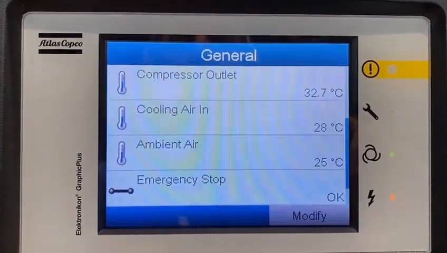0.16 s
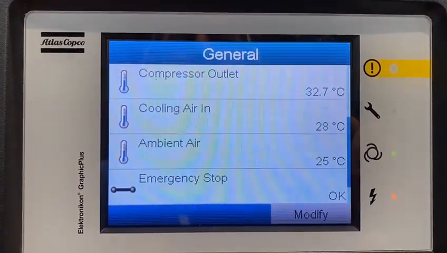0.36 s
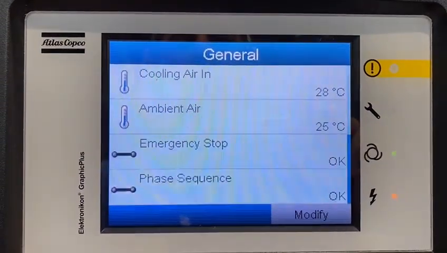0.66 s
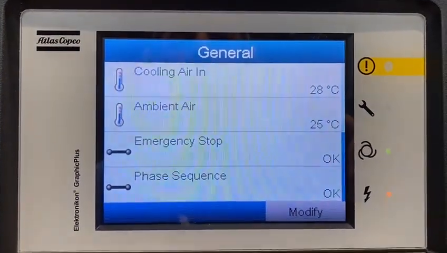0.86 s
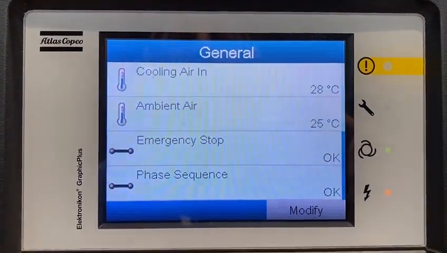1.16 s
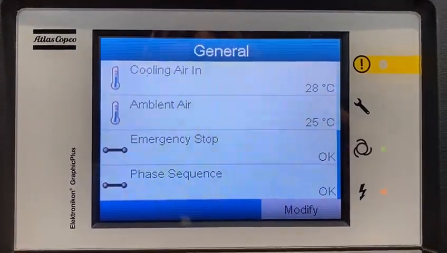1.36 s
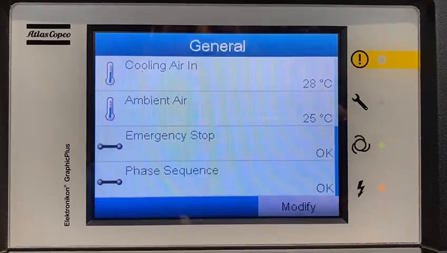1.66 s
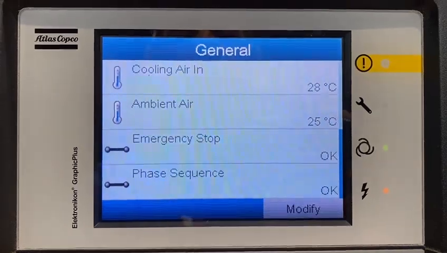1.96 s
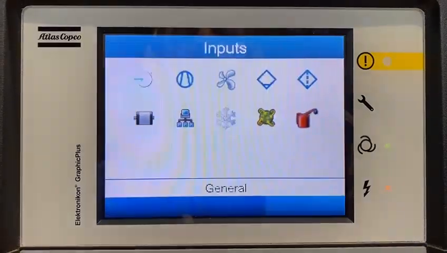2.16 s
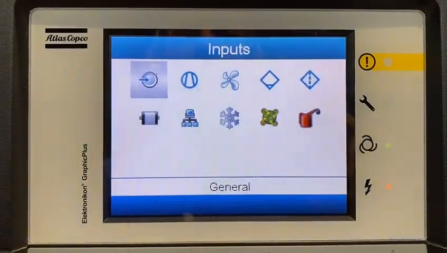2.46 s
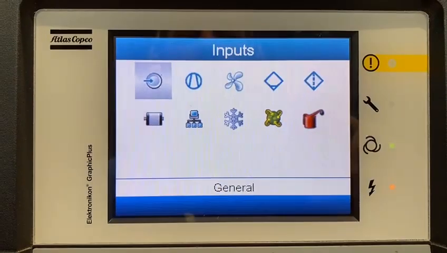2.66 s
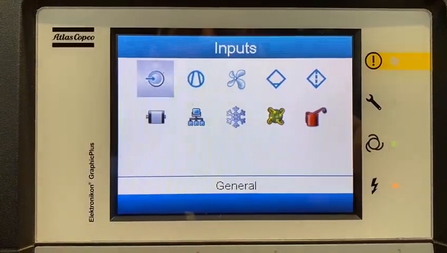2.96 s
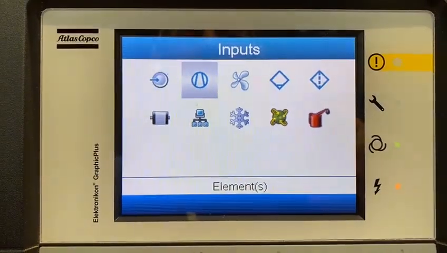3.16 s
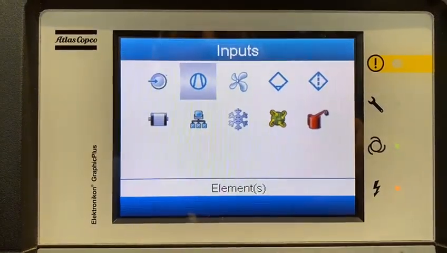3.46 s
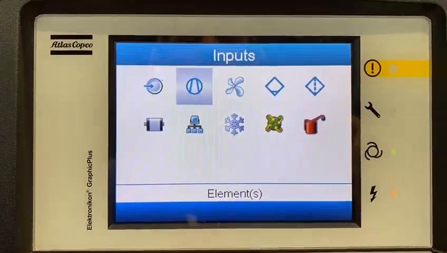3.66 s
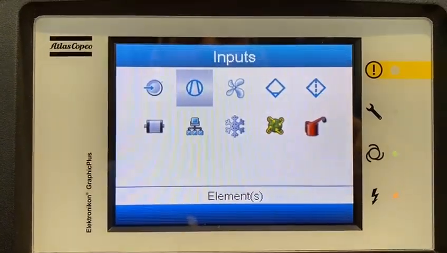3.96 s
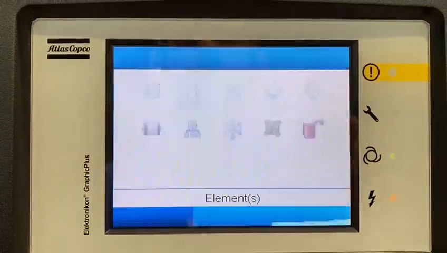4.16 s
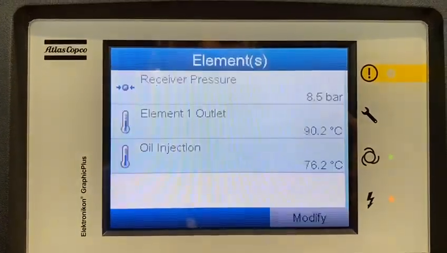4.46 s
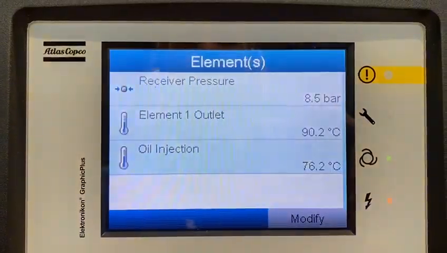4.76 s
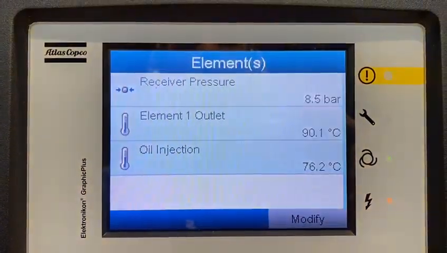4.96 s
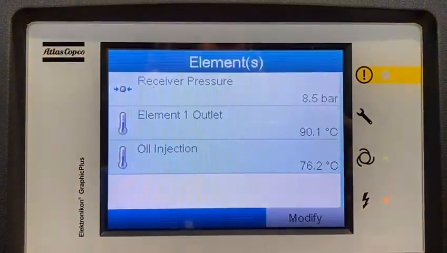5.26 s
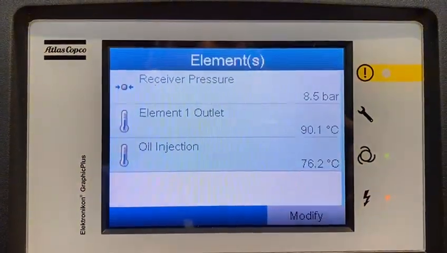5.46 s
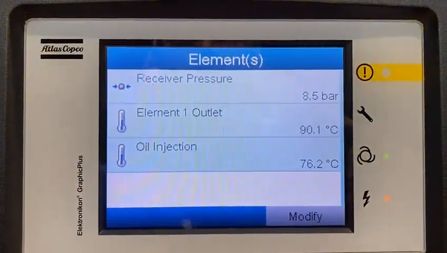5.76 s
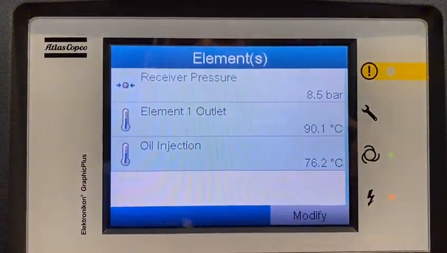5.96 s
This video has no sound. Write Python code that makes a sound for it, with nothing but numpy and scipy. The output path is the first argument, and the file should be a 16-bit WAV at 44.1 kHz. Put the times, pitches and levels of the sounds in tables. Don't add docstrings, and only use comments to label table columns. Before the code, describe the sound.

For about six seconds an industrial screw compressor runs without interruption, heard close up in a plant room. A firm low hum near 104 hertz, with a few weaker overtones, beats against the fan's slightly lower blade tone, giving a throb of roughly seven or eight pulses a second. Sheet-metal panels add a hollow, fluttering boom somewhat above the hum, rising and falling irregularly, with its strongest swell around 3.1 seconds and a dip near 4.5. Over it lies a dense, even rush of cooling air: low rumble, ducted roar with faint breathy whistles, and steady grille hiss. The fan tone is strongest near 1.5 seconds and fades from about 5 seconds, so the throb becomes shallower. The hum sits central while the air spreads across the close stereo pickup; the hiss is slightly grainy and its extreme top is cut off. It ends still running.

```python
import sys
import numpy as np
from scipy import signal
from scipy.fft import rfft, irfft, next_fast_len
from scipy.io import wavfile
from scipy.ndimage import uniform_filter1d

SR = 44100
rng = np.random.default_rng(int(sys.argv[2]) if len(sys.argv) > 2 else 0)


def master_out(mix):
    frames = np.transpose(np.atleast_2d(mix))
    ceiling = np.clip(frames, -1, 1)
    pcm = np.round(ceiling * 32767).astype(np.int16)
    wavfile.write(sys.argv[1], SR, pcm)


def attenuation_scalar(level_db):
    decades = np.asarray(level_db, float) / 20
    return 10 ** decades


N = 269787


def rms_one(x):
    return x / np.sqrt(np.mean(x ** 2) + 1e-20)


def in_time(rows):
    s, *columns = np.transpose(rows)
    return [np.interp(np.arange(N) / SR, s, column) for column in columns]


def drift(rate_hz):
    step = 40
    r = np.exp(-2 * step * np.pi * rate_hz / SR)
    slow = signal.lfilter([1], [1, -2 * r, r * r], rng.standard_normal(N // step + 2002))
    slow = slow[2000:]
    return np.interp(np.arange(N) / step, np.arange(len(slow)), rms_one(slow - slow.mean()))


def resonant_noise(hz, width_hz):
    r = np.exp(-np.pi * width_hz / SR)
    section = [1, 0, -1, 1, -2 * r * np.cos(2 * np.pi * hz / SR), r * r]
    ringing = signal.sosfilt([section, section], rng.standard_normal(N + SR))
    return rms_one(ringing[SR:])


# multiple of the pulse rate, left peak level/dB, right peak level/dB,
# right lead/rad
ROTOR_OVERTONES = [
    (1, -28.5, -28, 0.2),
    (2, -37.5, -50, -0.15),
    (3, -41, -44.5, 0.0021),
    (4, -43, -64, 0.17),
    (5, -65, -68, -0.37),
]


def rotor():
    pulse_hz, start_cycles = 104.489, -.122
    turn = 2 * np.pi * (pulse_hz * np.arange(N) / SR + start_cycles) + .03 * drift(1.5)
    out = np.zeros((2, N))
    for k, left_db, right_db, lead in ROTOR_OVERTONES:
        level_db = np.c_[[left_db, right_db]] + 0.36 * k * drift(1.8)
        out += attenuation_scalar(level_db) * np.cos(k * turn + np.c_[[0, lead]])
    return out


# t/s, peak level/dB
FAN_LEVEL = [(0, -27), (.9, -26.5), (1.5, -24.5), (1.9, -28), (2.4, -28.5), (3.1, -27), (3.8, -29.5),
             (4.3, -27), (4.7, -29.5), (5.3, -31.5), (5.6, -34.5), (6.1, -36)]
# t/s, lead/cycles
FAN_SLIP = [
    (0, -.49),
    (1.5, -.49),
    (2.7, -.36),
    (3.2, -.39),
    (3.9, -.31),
    (4.6, -.44),
    (6.1, -.43),
]


def fan():
    blade_hz, blades, shaft_db = 96.92, 3, -65
    slip, = in_time(FAN_SLIP)
    turn = 2 * np.pi * (blade_hz * np.arange(N) / SR + slip)
    blade_db, = in_time(FAN_LEVEL)
    return attenuation_scalar(blade_db) * np.cos(turn) + attenuation_scalar(shaft_db) * np.cos(turn / blades)


def panel(modes, level_db, evenness):
    boom = rms_one(sum(attenuation_scalar(share_db) * resonant_noise(hz, width_hz) for hz, width_hz, share_db in modes))
    swell = uniform_filter1d(boom ** 2, size=8000) + 0.086
    return attenuation_scalar(level_db) * rms_one(boom * swell ** (-evenness / 2))


# f/Hz, width/Hz, share level/dB
LOW_PANEL = [
    (139.7, 7.9, -1.2),
    (151.2, 5.3, -4.5),
]
# f/Hz, width/Hz, share level/dB
HIGH_PANEL = [
    (193.74, 7.9, 3.9),
    (211.8, 12.3, -2.5),
]
# t/s, level/dB (against the mean)
BUFFETING = [(0, -2), (.35, 2), (.65, 2), (.9, -3), (1.12, 3), (1.3, -4), (1.95, 2), (2.35, -3), (2.65, 2),
             (2.85, 0.5), (3.15, 6.5), (3.6, -0.5), (4.15, -2), (4.3, 1), (4.5, -4.5), (5.0, 1), (5.4, 2),
             (6.12, 1)]


def cabinet():
    buffet_db, = in_time(BUFFETING)
    rock_hz, rock_peak_s = 3.93, .075
    rock = np.cos(2 * np.pi * rock_hz * (np.arange(N) / SR - rock_peak_s))
    low_db = -35 + buffet_db
    high_db = -35.5 + 0.66 * buffet_db + 2.5 * rock
    low = panel(LOW_PANEL, low_db, evenness=.8)
    high = panel(HIGH_PANEL, high_db, evenness=.8)
    aside = attenuation_scalar(low_db - 30) * resonant_noise(140, 22) + attenuation_scalar(high_db - 15.5) * resonant_noise(189, 28)
    return low + high + aside * np.c_[[1, -1]]


WHISTLE_HZ = [119, 553, 686, 740, 805, 843, 969, 1168, 1928, 2080, 2275, 2550, 3052, 4409]
# width/Hz, rms level/dB, left-over-right level/dB
WHISTLES = [(3, -52, .1), (14, -53, 5), (22, -52, 5), (8, -56, 4), (18, -51, 4), (26, -50.5, 4),
            (14, -56, 2), (8, -58, .6), (18, -52, -1.5), (22, -50, -1.1), (34, -48.5, .3), (8, -57, 2.2),
            (12, -57, 4), (30, -57, 2.2)]


def whistles(alike, surge_db):
    out = np.zeros((2, N))
    for hz, (width_hz, level_db, balance_db) in zip(WHISTLE_HZ, WHISTLES):
        common, own = resonant_noise(hz, width_hz), resonant_noise(hz, width_hz)
        pair = np.array([common, alike * common + np.sqrt(1 - alike ** 2) * own])
        port_db = level_db + np.c_[[.5, -.5]] * balance_db
        out += attenuation_scalar(port_db + surge_db * drift(1.6)) * pair
    return out


# f/Hz, level/dB (per Hz), left-over-right level/dB, likeness (0-1), right lead/rad
AIR_FIELD = [(20, -78.6, 0.1, 0.98, 0.03), (35, -70.3, 0.1, 0.99, -0.01), (55, -63.2, 0.1, 0.99, -0.01),
             (80, -59.1, 0.2, 0.95, 0.03), (115, -54.7, 0.1, 0.96, 0.02), (170, -56.5, 0.3, 0.83, -0.19),
             (235, -57.7, 3.0, 0.66, -0.18), (260, -58.8, 1.4, 0.72, -0.41), (290, -60.4, 1.4, 0.69, -0.45),
             (350, -62.2, 0.6, 0.51, -0.26), (400, -63.9, -0.0, 0.28, 0.19), (470, -64.1, 2.3, 0.35, -0.78),
             (550, -62.8, 5.6, 0.58, -2.15), (600, -64.7, 3.2, 0.29, -1.61),
             (634, -61, 0.5, 0.95, -2), (735, -66, 7, 0.8, -2), (837, -60.5, 5.5, 0.25, -3),
             (901, -65, 0, 0.1, -1), (987, -65.5, 3, 0.63, -3.1), (1143, -62.5, 0.5, 0.53, -2),
             (1235, -65, 1, 0.57, -3), (1518, -63.5, -0.5, 1, -2.5), (1538, -66, -3.5, 0.34, -1.5),
             (1693, -60, -1.5, 1, -4.5), (1773, -61, -5.5, 0.22, -5), (2030, -61, 2.8, 0.86, -7.5),
             (2265, -58.5, -5, 0.42, -4.5), (2294, -62.5, 2, 0.64, -5.5),
             (2600, -64.1, 2.2, .46, -6.9), (3000, -64.4, 4.3, .55, -7.1), (3400, -65.8, 4.6, .45, -6.8),
               (3750, -65.6, 3.2, .62, -6.4), (4200, -65, 1.8, .72, -6.5), (4600, -66, 1.9, .58, -6.55),
               (5000, -66.1, 3.7, .42, -6.8), (5500, -68, 4.4, .28, -6.7), (6000, -70.1, 2, .5, -6.5),
               (6450, -70, .2, .93, -6.45), (7050, -68.2, 0, 1, -6.28), (7900, -68.6, 0, 1, -4.9),
               (9000, -68, 0, 1, -3.14), (11200, -69, 0, 1, .1)]


def rushing_air(patchy_db, shared_db):
    size = next_fast_len(N)
    hz = np.maximum(np.arange(size // 2 + 1) * SR / size, 10)
    table_hz, *columns = np.transpose(AIR_FIELD)
    level_db, balance_db, alike, lead = [np.interp(np.log(hz), np.log(table_hz), c) for c in columns]
    alike = np.clip(alike, 0, 1)
    common, own = rfft(rng.standard_normal((2, size)))
    right = alike * np.exp(1j * lead) * common + np.sqrt(1 - alike ** 2) * own
    left_share = 1 / (1 + attenuation_scalar(-2 * balance_db))
    ports = np.array([common * np.sqrt(left_share), right * np.sqrt(1 - left_share)])
    ports = ports * attenuation_scalar(level_db) * np.sqrt(SR)
    out, together = 0, drift(4.2)
    place = 2 * np.log2(hz / 20)
    for band in range(20):
        band_gain = np.cos(np.pi / 2 * np.clip(place - band, -1, 1)) ** 2
        part = irfft(ports * band_gain, size)[:, :N]
        out = out + part * attenuation_scalar(patchy_db * drift(4.6) + shared_db * together)
    return out * attenuation_scalar(0.04 - 0.03 * drift(1.0))


def scene():
    machine = rotor() + fan() + cabinet()
    return machine + whistles(alike=.5, surge_db=3) + rushing_air(patchy_db=.6, shared_db=.1)


BAND_EDGES = [*range(0, 40, 4), *range(40, 96, 8),
              96, 108, 120, 132, 144, 160, 176, 196, 216, 240, 264, 292, *range(320, 576, 32), 553]
# f/Hz, hidden below the louder level/dB, wander level/dB
MASKING = [(100, 44, 2), (700, 26, 3), (1050, 16, 4.5), (1400, 14, 4.5), (1750, 14, 3.5), (2100, 16.5, 3.5),
           (2350, 13, 3.5), (3000, 14.5, 3.5), (5200, 14, 3), (5900, 10, 4), (7200, 13, 3), (7900, 3, 4),
           (9000, 14, 2.5), (10000, 5, 4.5), (10600, 13, 3), (11400, 12, 3), (11800, -7.5, 3)]


def masked(stereo, weaker_db, empty_db):
    frame = 1024
    lines, k = BAND_EDGES[-1], np.arange(2 * frame) + .5
    bell = np.kaiser(frame + 1, 4 * np.pi)
    rise = np.sqrt(np.cumsum(bell[:frame]) / bell.sum())
    waves = np.cos(np.pi / frame * np.outer(k + frame / 2, np.arange(lines) + .5))
    basis = np.r_[rise, rise[::-1]][:, None] * waves
    lead, frames = 2 * frame - 414, N // frame + 4
    mid_side = np.array([stereo[0] + stereo[1], stereo[0] - stereo[1]]) / 2
    padded = np.pad(mid_side, ((0, 0), (lead, frames * frame - N - lead)))
    halves = padded.reshape(2, frames, frame)
    coefs = np.concatenate([halves[:, :-1], halves[:, 1:]], axis=2) @ basis
    band = np.searchsorted(BAND_EDGES, np.arange(lines), "right") - 1
    width = np.diff(BAND_EDGES)
    power = np.add.reduceat(coefs ** 2, BAND_EDGES[:-1], axis=2) / width
    mask_hz, mask_db, wander_db = np.transpose(MASKING)
    centre_hz = (np.array(BAND_EDGES[:-1]) + width / 2) * SR / (2 * frame)
    wander = uniform_filter1d(rng.standard_normal(power.shape), size=2, axis=1)
    wander = rms_one(uniform_filter1d(wander, size=2, axis=2)) * np.interp(centre_hz, mask_hz, wander_db)
    steady = power.mean(axis=1, keepdims=True)
    coarser_db = np.minimum(15 * np.log10(steady.max(axis=0) / steady), weaker_db)
    under_db = np.interp(centre_hz, mask_hz, mask_db) + wander - coarser_db
    limit = steady.max(axis=0) * attenuation_scalar(-2 * under_db)
    step = 2 * np.sqrt(limit[..., band])
    rungs = np.floor(np.abs(coefs / step) ** .75 + .4054) ** (4 / 3)
    kept = (power > limit * attenuation_scalar(2 * empty_db))[..., band]
    pieces = (np.sign(coefs) * rungs * step * kept) @ basis.T * 2 / frame
    joined = (pieces[:, 1:, :frame] + pieces[:, :-1, frame:]).reshape(2, -1)
    mid, side = joined[:, lead - frame:][:, :N]
    return np.array([mid + side, mid - side])


def roll_off(x):
    return signal.sosfilt(signal.butter(12, 12900, fs=SR, output="sos"), x)


def record(dry):
    thinned = masked(dry, weaker_db=13, empty_db=-5)
    return roll_off(thinned)


dry = scene()
out = record(dry)
master_out(out)
```